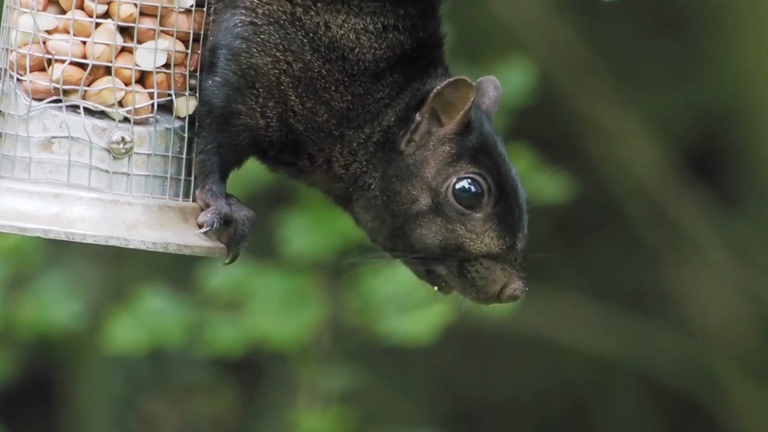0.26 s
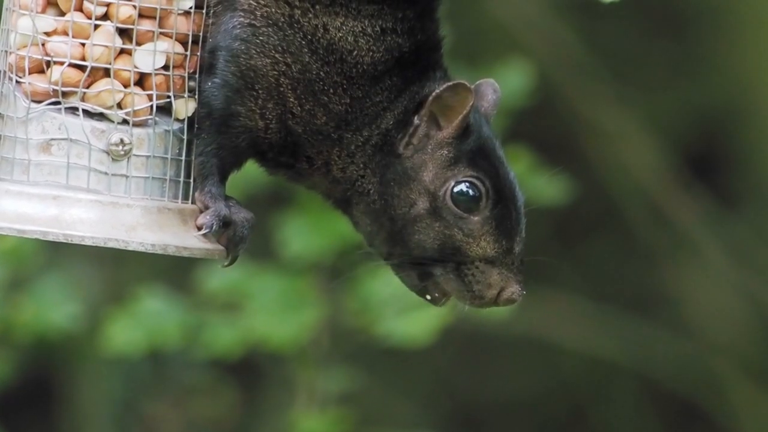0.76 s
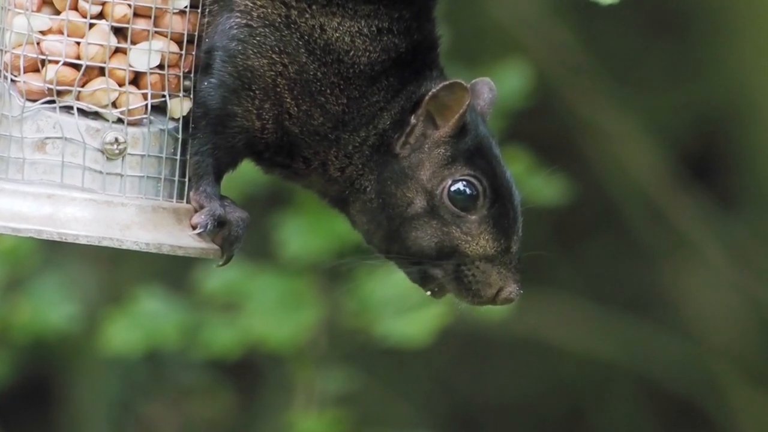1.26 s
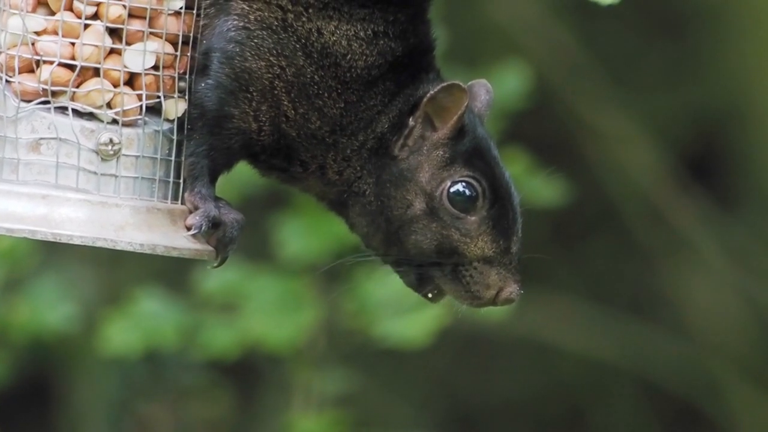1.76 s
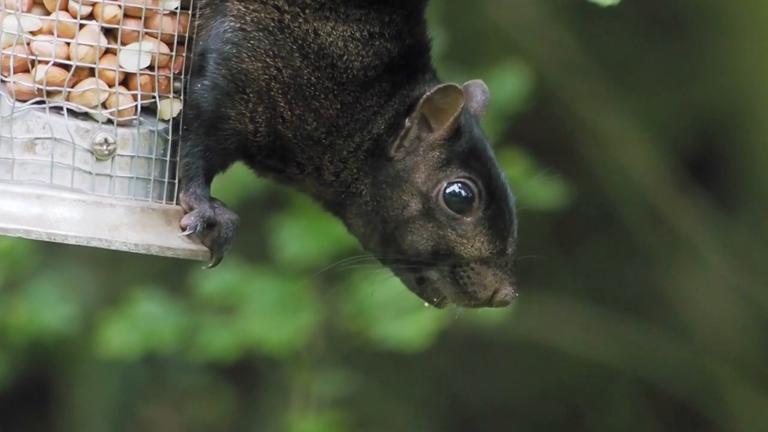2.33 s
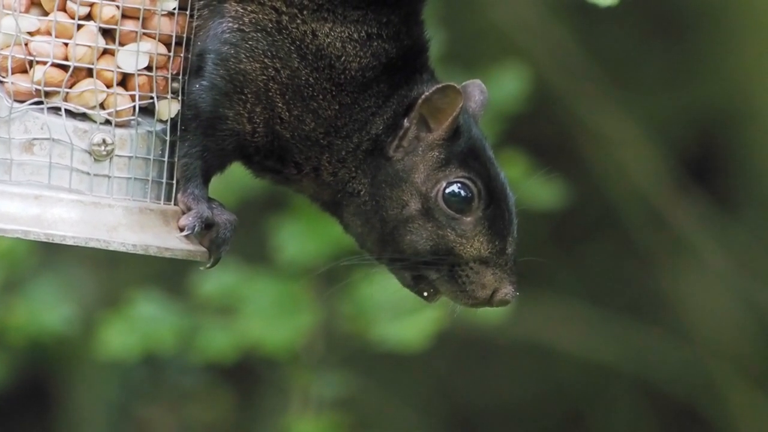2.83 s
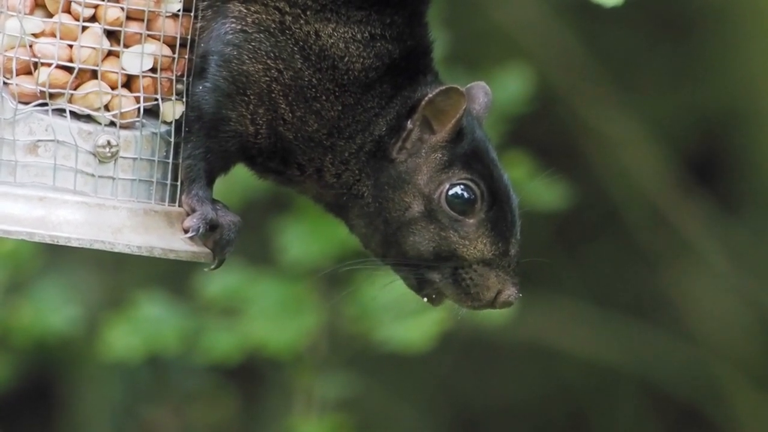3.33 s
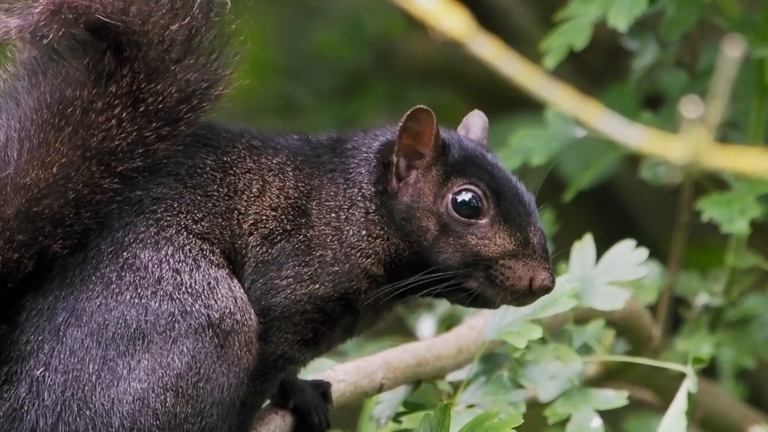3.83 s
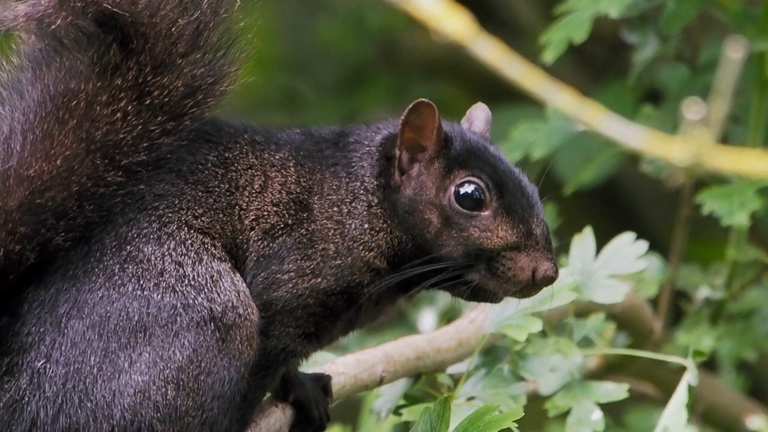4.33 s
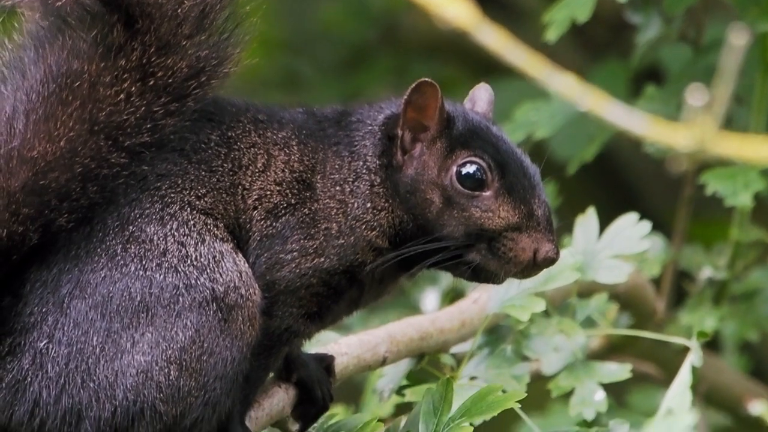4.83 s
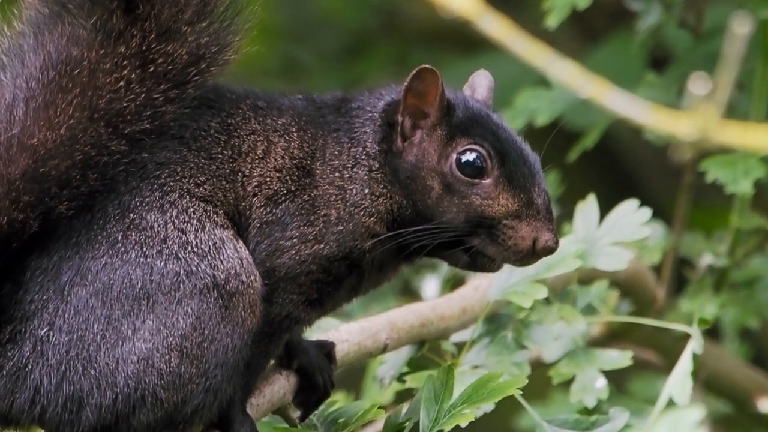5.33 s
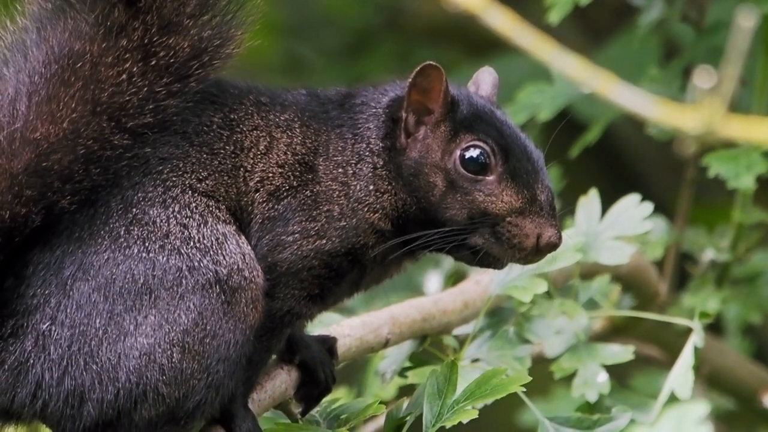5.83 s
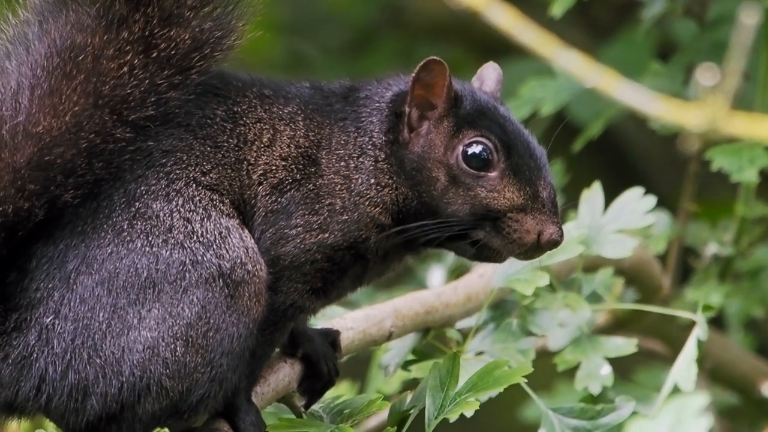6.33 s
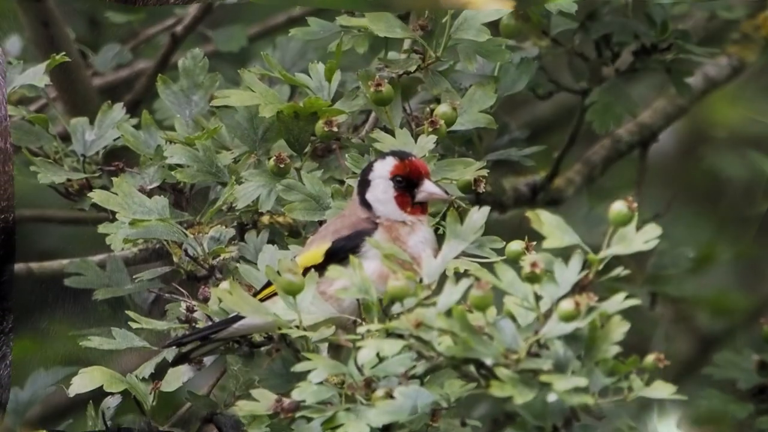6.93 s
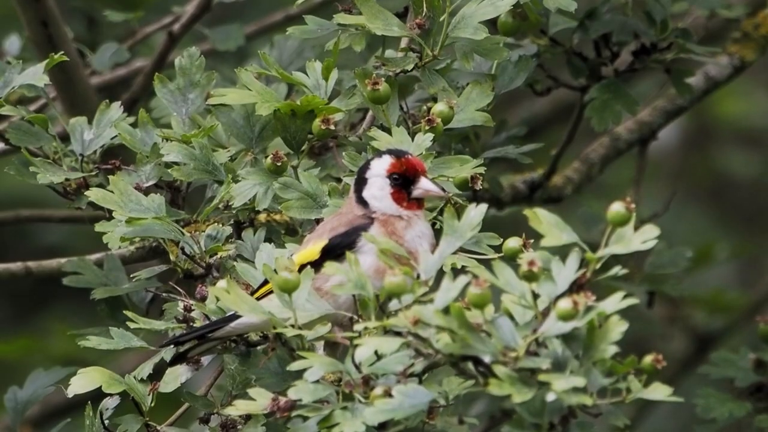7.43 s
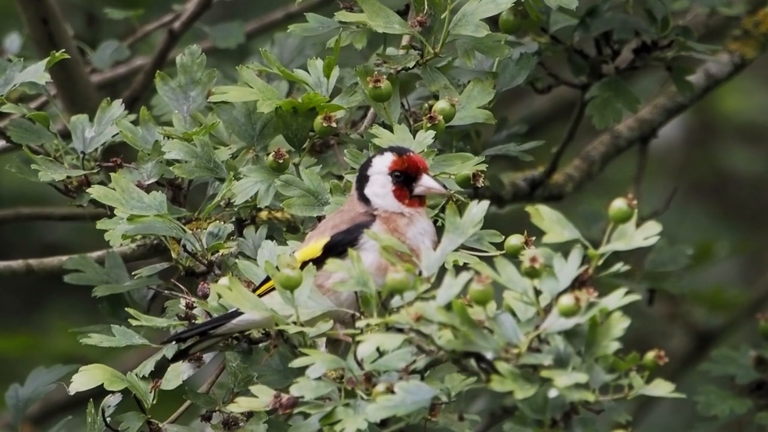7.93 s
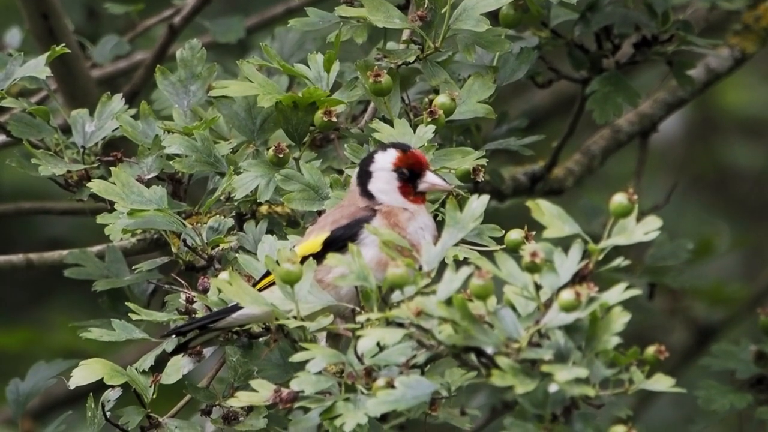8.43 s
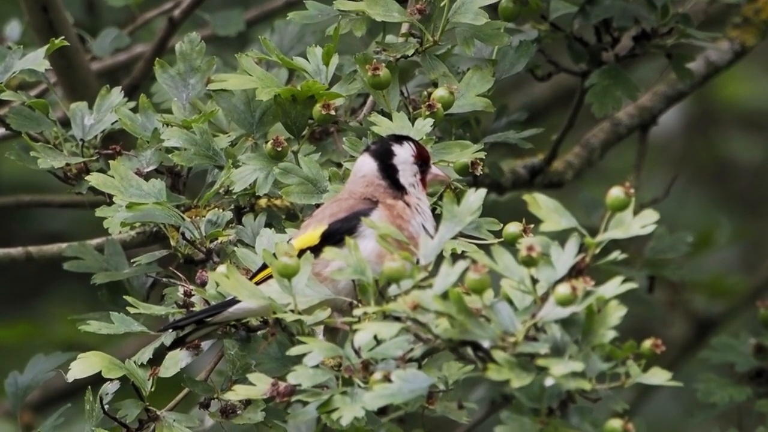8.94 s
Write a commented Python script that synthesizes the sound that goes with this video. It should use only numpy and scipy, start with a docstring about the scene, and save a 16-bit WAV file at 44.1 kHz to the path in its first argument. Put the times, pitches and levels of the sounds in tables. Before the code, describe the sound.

Harsh rasping screeches from a jay-like bird in echoing woodland, then thin mews and short barks, with bright falling songbird chirps.

```python
"""Low rumble, soft woodland wash and stereo microphone hiss last throughout, as filtered noise with a faint whine.
A jay-like bird screeches four long rasps, made of uneven pulses and breath shaped by throat resonances.
Quiet ticks of other birds, short wavering tones, are scattered from the first second to the end.
Then come thin whistled mews and a run of short barks, pulses again with one clear harmonic.
During the barks a songbird gives two bursts of high falling chirps, nearly pure tones; the wood echoes every bird."""
import sys
import numpy as np
from scipy import signal
from scipy.fft import rfft, irfft, next_fast_len
from scipy.io import wavfile
from scipy.ndimage import map_coordinates

SR = 44100
rng = np.random.default_rng(int(sys.argv[2]) if len(sys.argv) > 2 else 0)


def log_audio(samples):
    """Write samples as a 16-bit WAV file to the path given in sys.argv[1]."""
    # one column per channel
    frames = np.atleast_2d(samples).T
    # limit to full scale, then quantise
    limited = np.clip(frames, -1, 1)
    pcm = np.round(limited * 32767).astype(np.int16)
    wavfile.write(sys.argv[1], SR, pcm)


N = 404838
TIME = np.arange(N) / SR


def undb(db):
    """Turn decibels into a gain."""
    return 10 ** (np.asarray(db) / 20)


def unit(x):
    """Scale to an average strength (rms) of 1."""
    return x / np.sqrt(np.mean(x ** 2) + 1e-18)


def walk(rate, size):
    """Wander smoothly and at random with spread 1, about `rate` turns a second."""
    knots = rng.standard_normal(8192)
    return unit(map_coordinates(knots, [np.arange(size) * rate / SR], order=2, mode="wrap"))


def colour(x, shape, ratio=1):
    """Filter through (frequency, dB) points, their frequencies multiplied by ratio; the result has rms 1."""
    hz, db = np.transpose(shape)
    size = 2 * next_fast_len(len(x) // 2 + 2048)
    f = np.maximum(np.fft.rfftfreq(size, 1 / SR), 1)
    shape_db = np.interp(np.log(f), np.log(hz * ratio), db)
    cepstrum = irfft(np.log(undb(shape_db)))
    # keeping only the forward half lets each resonance ring after its pulse, never before
    response = np.exp(rfft(2 * cepstrum[:size // 2], size) - cepstrum[0])
    return unit(irfft(rfft(x, size) * response, size)[:len(x)])


def note_times(length):
    """Time in seconds of every sample in a note."""
    return np.arange(int(length * SR)) / SR


def fade(t, length, rise, fall):
    """Open and close a note smoothly; all times in seconds."""
    opening = np.clip(t / rise, 0, 1)
    closing = np.clip((length - t) / fall, 0, 1)
    return np.sin(np.pi / 2 * opening * closing) ** 2


def add(track, start, x):
    """Mix a sound into a track at a time in seconds."""
    i = int(start * SR)
    track[i:i + len(x)] += x[:N - i]


def whistle(hz, waver):
    """A single tone whose pitch trembles quickly by the share `waver`."""
    trembling_hz = hz * (1 + waver * walk(450, len(hz)))
    return unit(np.sin(2 * np.pi * np.cumsum(trembling_hz) / SR))


def air():
    """Rumble and woodland wash shared by both channels, hiss that differs between them, and an electronic whine."""
    # colour of the shared sound: (frequency [Hz], relative level [dB])
    shared_shape = [(12, -26.5), (20, -3), (44, -1), (66, -7), (80, -12.5), (144, -22.5), (362, -32),
                    (404, -30), (439, -32), (834, -32.5), (1010, -24), (1230, -24.5), (1820, -25.5),
                    (8170, -41.5), (15500, -39.5)]
    # colour of the difference between channels: (frequency [Hz], relative level [dB])
    difference_shape = [(12, -31), (20, -10), (80, 3), (133, -2.5), (166, -26), (191, 1), (252, -5),
                        (404, -4), (686, -8), (1010, -2.5), (1410, -2), (1540, -3.5), (4550, -6),
                        (8400, -14), (15500, -11.5)]
    shared_db, difference_db, whine_db = -52, -60.5, -82
    slow_drift = undb(0.19 * walk(3.535, N))
    mid = undb(shared_db) * colour(rng.standard_normal(N), shared_shape) * slow_drift
    side = undb(difference_db) * colour(rng.standard_normal(N), difference_shape)
    whine = undb(whine_db) * unit(np.sin(2 * np.pi * 14758 * TIME))
    return np.array([mid + side, mid - side]) + whine


def syrinx(hz, jitter, breath, rattle_db, rattle_hz):
    """Membranes slap shut at an uneven rate, air hisses through each opening, and a slower rattle shakes both."""
    size = len(hz)
    unsteady = 1 + jitter * walk(700, size) + 0.017 * walk(22, size)
    phase = np.cumsum(hz * np.clip(unsteady, 0.3, 2)) / SR
    cycle = phase.astype(int)
    # one click per cycle, each of its own random strength
    strength = undb(1.9 * rng.standard_normal(2048))
    slaps = np.diff(cycle, prepend=0) * strength[cycle]
    hiss = rng.standard_normal(size) * np.exp(-(phase % 1))  # fades within each cycle
    uneven_rattle_hz = rattle_hz * (1 + 0.143 * walk(58.8, size))
    rattle = np.sin(2 * np.pi * np.cumsum(uneven_rattle_hz) / SR)
    return (unit(slaps - slaps.mean()) + breath * unit(hiss)) * undb(rattle_db * rattle)


def rasps():
    """Long screeches: effort builds to a crest and eases; side resonances widen the band below and above the throat."""
    # long rasps: (start [s], length [s], time to full effort [s], level [dB], drop when slack [dB],
    #   pitch [Hz], pitch jitter [share], throat frequency [ratio], low resonance [dB], opening cough [dB],
    #   growl relative to low resonance [dB], high resonance [Hz], its level [dB],
    #   overtone [Hz], its level relative to high resonance [dB])
    rasp_calls = [(.076, 0.51, .44, -35, 2.5, 346.7, .15, 1.035, -11.5, -3, -8, 2820, -12.5, 5430, -11),
                  (1.549, 0.47, 0.3, -31.5, 8, 316.1, 0.056, 1.022, -15, -8, -15.5, 2890, -16.5, 5450, -14.5),
                  (2.395, 0.68, 0.22, -35.5, 3.5, 409.5, .13, 1.076, -18, -34, -22, 2593, -14.5, 5900, -17),
                  (3.459, 0.65, 0.51, -39, 5.5, 414.6, .075, 1.087, -23.5, -28, -21, 2290, -25, 4280, -5)]
    # main throat, low and growl resonances: (frequency [Hz], relative level [dB])
    throat_shape = [(600, -51.5), (950, -30.5), (1220, 1.5), (1550, 6), (1850, 1.5), (2100, 3),
                    (2300, -12.5), (2550, -50), (3200, -29.5), (4300, -32.5), (7000, -53.5)]
    low_shape = [(420, -52), (600, -37.5), (820, -17), (970, -3.5), (1130, 0), (1400, -48)]
    growl_shape = [(420, -51), (520, -28), (620, -14.5), (720, 2), (820, 6), (1000, -42)]
    # high resonance and its narrow overtone: (frequency [ratio to its own centre], relative level [dB])
    high_shape = [(.7, -37), (.88, 0.5), (1.0, -0.5), (1.08, -4.5), (1.19, -15.5), (1.5, -44)]
    overtone_shape = [(.75, -45), (.89, -16), (.95, -1), (1.04, 0), (1.1, -15), (1.3, -45)]
    end_effort = 0.38  # share of effort left at the end
    throat_rise, high_rise = 0.038, 0.1  # shares by which resonances climb with effort
    low_open_db, high_open_db = 7.5, 0.5  # how far the side resonances open
    cough_s, high_lag_s = 0.033, 0.089  # fading time of the cough, arrival time of the high resonance
    out = np.zeros(N)
    for (start, length, crest_s, db, swell_db, hz, jitter, ratio, low_db, cough_db,
         growl_db, high_hz, high_db, over_hz, over_db) in rasp_calls:
        t = note_times(length)
        progress = t / length
        effort = np.interp(t, [0, min(crest_s, length), length], [0, 1, end_effort])
        slack = 1 - effort
        source = syrinx(np.full(len(t), hz), jitter, breath=0.45, rattle_db=2.2, rattle_hz=56)

        def flutter():
            """Unsteady level of a side resonance."""
            return undb(1.66 * walk(23.7, len(t)))

        def strained(shape, top, rise):
            """Blend from a lower resonance when slack to a higher one at full effort."""
            relaxed = colour(source, shape, top * (1 - rise))
            return slack * relaxed + effort * colour(source, shape, top)

        throat = strained(throat_shape, ratio, throat_rise)
        # the low resonance sounds with the opening cough, then creeps in with a growl towards the end
        low_gain = undb(low_db - low_open_db * (1 - progress)) * flutter()
        cough_gain = undb(cough_db) * np.exp(-t / cough_s)
        low = (low_gain + cough_gain) * colour(source, low_shape)
        growl = low_gain * undb(growl_db) * (0.46 + progress) * colour(source, growl_shape)
        # the high resonance and its overtone come in late and follow the effort
        late = 1 - np.exp(-t / high_lag_s)
        high_gain = undb(high_db - high_open_db * slack) * late * flutter()
        overtone = undb(over_db) * colour(source, overtone_shape, over_hz)
        high = strained(high_shape, high_hz, high_rise) + overtone
        voice = throat + low + growl + high_gain * high
        loudness = undb(db - swell_db * slack) * fade(t, length, rise=0.042, fall=0.031)
        add(out, start, voice * loudness)
    return out


def ticks():
    """Brief notes of other small birds: a wavering tone whose pitch bows upward and may glide."""
    # ticks: (start [s], pitch [Hz], glide [share of pitch], level [dB])
    tick_notes = [(.81, 7500, 0.012, -61.5), (2.047, 7400, 0, -60), (2.049, 4280, 0.055, -44),
                  (2.197, 4080, -0.084, -50), (3.255, 4560, -0.02, -50), (3.742, 3050, .01, -52),
                  (3.957, 4500, 0, -56), (5.94, 7530, -0.063, -52.5), (7.747, 4620, -0.01, -53),
                  (8.467, 7500, -0.071, -57.5)]
    length = 0.029  # s
    pitch_bow, waver = 0.049, 0.02  # shares of the pitch
    out = np.zeros(N)
    t = note_times(length)
    bow = pitch_bow * (np.sin(np.pi * t / length) - 1)  # lowest at both ends
    for start, hz, glide, db in tick_notes:
        tone = whistle(hz * (1 + glide * t / length + bow), waver)
        add(out, start, undb(db) * tone * fade(t, length, length / 2, length / 2))
    return out


def mews():
    """Whistles slide up unsteadily and settle; the other side of the syrinx joins in hoarsely, higher up."""
    # thin mews: (start [s], length [s], settled pitch [Hz], level [dB], hoarseness [dB])
    mew_notes = [(4.116, 0.11, 2232, -43, -20), (4.228, 0.054, 2280, -50, -15),
                 (4.289, 0.32, 2291, -37.5, -10.5)]
    # colour of the hoarse noise: (frequency [Hz], relative level [dB])
    hoarse_shape = [(2200, -27), (2450, 4.5), (2750, 8.5), (2850, -12), (3050, -27), (3800, -6),
                    (4100, -29)]
    scoop, settle_s = 0.0798, 0.035  # starts this share flat; time scale of the slide
    waver, start_waver = 0.014, 0.031  # shares of the pitch: throughout, and extra until it settles
    crest, swell_db, sag_db = 0.26, 9, 8.5  # loudest at this share of the length; rise before, drop after
    out = np.zeros(N)
    for start, length, hz, db, hoarse_db in mew_notes:
        t = note_times(length)
        unsettled = np.exp(-t / settle_s)
        tone = whistle(hz * (1 - scoop * unsettled), waver + start_waver * unsettled)
        flicker = undb(2.2 * walk(89, len(t)))
        hoarse = colour(rng.standard_normal(len(t)), hoarse_shape) * (1 - unsettled)
        voice = tone * flicker + undb(hoarse_db) * hoarse
        loudness_db = db + np.interp(t / length, [0, crest, 1], [-swell_db, 0, -sag_db])
        add(out, start, voice * undb(loudness_db) * fade(t, length, rise=0.014, fall=0.014))
    return out


def barks():
    """Short squawks, mostly falling, from the same kind of voice; one harmonic stays clear above the rough pulses."""
    # short barks: (start [s], length [s], first pitch [Hz], last pitch [Hz], level [dB],
    #   throat frequency [ratio], clear harmonic relative to the rough voice [dB])
    bark_calls = [(4.34, 0.13, 433, 425, -39.5, 0.98, 0.5), (4.451, 0.091, 546, 414.4, -36.5, 1.1, -9.5),
                  (4.513, 0.078, 582, 471, -42, 0.82, -13), (4.61, 0.081, 574, 498, -42.5, 1, -12),
                  (4.647, .072, 533, 418.5, -44, 1.18, -5), (4.694, 0.0533, 537, 434, -44, 1.05, -13),
                  (4.927, 0.08, 504, 407.6, -33.5, .96, -12), (4.99, .07, 543, 414, -42.5, 0.83, -11),
                  (5.246, .085, 483, 477.4, -32, 1.03, -1), (5.28, 0.073, 534, 414.5, -33.5, 0.94, -11.5),
                  (5.347, 0.11, 516, 461, -49.5, 1.1, 2.5), (5.397, 0.077, 488, 475.6, -30.5, 1.044, -2.5),
                  (5.448, 0.073, 543, 447, -41, 0.82, -23), (5.798, .11, 521, 415, -32.5, 0.99, -24),
                  (5.862, 0.079, 625, 508, -39.5, .9, -4), (5.96, 0.094, 477, 443, -42.5, 0.92, -29),
                  (6.27, 0.13, 518, 403.5, -33.5, 0.9, -15), (6.347, 0.221, 426.4, 436.5, -37.5, .98, -2.5),
                  (6.97, 0.077, 381.5, 475, -45.5, .87, -8.5), (7.03, 0.099, 449, 468, -42.5, 0.85, -21),
                  (8.025, 0.32, 456.6, 538.6, -58.5, 0.69, -3), (8.301, 0.058, 612, 420, -52.5, 0.75, 6)]
    # throat resonances: (frequency [Hz], relative level [dB])
    throat_shape = [(500, -50.5), (740, -26), (900, -18.5), (1100, -3), (1300, 1), (1480, 1), (1750, 3.5),
                    (2050, -5), (2350, -22), (2700, -37), (3300, -35.5), (4100, -28.5), (5000, -44),
                    (7000, -57)]
    jitter, waver = 0.072, 0.016  # shares of the pitch: rough voice, clear harmonic
    held_glide = 0.07  # a bark gliding by less than this share counts as a held note
    sag_db_per_s = 22.5
    out = np.zeros(N)
    for start, length, first_hz, last_hz, db, ratio, clear_db in bark_calls:
        t = note_times(length)
        hz = np.linspace(first_hz, last_hz, len(t))
        source = syrinx(hz, jitter, breath=0.45, rattle_db=2.0, rattle_hz=110)
        # the third harmonic is clear on a held pitch, the second on a glide
        held = abs(last_hz / first_hz - 1) < held_glide
        harmonic = 3 if held else 2
        clear = undb(clear_db) * whistle(harmonic * hz, waver)
        voice = colour(source, throat_shape, ratio) + clear
        loudness = undb(db - sag_db_per_s * t) * fade(t, length, rise=0.038, fall=0.03)
        add(out, start, voice * loudness)
    return out


def chirps():
    """Nearly pure tones flick up to a top pitch and slide down, swelling to a peak before a softer tail."""
    # songbird chirps: (start [s], length [s], top pitch [Hz], last pitch [Hz], level [dB],
    #   time of the loudest moment after the start [s])
    chirp_notes = [(4.65, 0.044, 6940, 5930, -39, 0.022), (4.745, 0.049, 7400, 5600, -38.5, 0.028),
                   (4.844, 0.068, 7170, 5400, -37.5, 0.036), (7.216, 0.045, 7640, 6230, -23, 0.023),
                   (7.291, .053, 7600, 6020, -24.5, 0.022), (7.38, 0.062, 7320, 5520, -25.5, 0.015),
                   (7.483, 0.068, 7220, 5510, -31, 0.018)]
    flick, top_s = 0.21, 0.00995  # starts this share flat; time to reach the top pitch
    tremble, octave_db = 0.0095, -32  # share of the pitch; level of the tone an octave up
    swell_db, tail_db, drop_s = 25, -5, 0.0031  # rise to the peak, level after it, time to drop there
    out = np.zeros(N)
    for start, length, top_hz, last_hz, db, crest_s in chirp_notes:
        t = note_times(length)
        hz = np.interp(t, [0, top_s, length], [top_hz * (1 - flick), top_hz, last_hz])
        trembling_hz = hz * (1 + tremble * walk(589, len(t)))
        phase = 2 * np.pi * np.cumsum(trembling_hz) / SR
        tone = unit(np.sin(phase) + undb(octave_db) * np.sin(2 * phase))
        loudness_db = db + np.interp(t, [0, crest_s, crest_s + drop_s], [-swell_db, 0, tail_db])
        add(out, start, tone * undb(loudness_db) * fade(t, length, rise=0.0015, fall=0.008))
    return out


def wood(x, lag_ms, pan_db, near_db, near_t60, far_db, far_t60):
    """Nearby trunks echo from the bird's side, far ones from all round; each t60 is the seconds to fade by 60 dB."""
    t = TIME[:SR]
    # sparse random echoes, none in the first 2 ms
    trunks = rng.standard_normal(SR) * (rng.random(SR) < 0.03) * (t > 0.002)
    near = trunks * undb(-60 * t / near_t60)
    near *= undb(near_db) / np.linalg.norm(near)
    near[0] = 1  # the direct sound
    # dense far echoes, partly alike in the two channels
    far = rng.standard_normal((3, SR)) * undb(-60 * t / far_t60) * np.clip(t / 0.0097, 0, 1)
    far = far[:2] + 0.74 * far[2]
    far *= undb(far_db) / np.linalg.norm(far[0])
    pair = np.array([signal.fftconvolve(x, near + side)[:N] for side in far])
    # the sound reaches the left microphone late
    size = next_fast_len(N)
    khz = np.fft.rfftfreq(size, 1000 / SR)
    delay = np.exp(-2j * np.pi * khz * lag_ms)
    pair[0] = irfft(rfft(pair[0], size) * delay, size)[:N]
    # a negative pan makes the right channel louder
    balance = undb(np.array([[pan_db], [-pan_db]]) / 2)
    return pair * balance / np.sqrt(1 + undb(near_db) ** 2)


def scene():
    """The screecher sits deep in the echoes; the small birds have less echo and sound more to the right."""
    screecher = wood(rasps() + mews() + barks(), lag_ms=0.04, pan_db=-0.5,
                     near_db=-3.5, near_t60=0.26, far_db=-8.0, far_t60=0.52)
    small_birds = wood(ticks() + chirps(), lag_ms=0.096, pan_db=-1.2,
                       near_db=-8, near_t60=0.08, far_db=-8, far_t60=0.28)
    return air() + screecher + small_birds


def record(dry):
    """The recorder steeply cuts everything above 15.8 kHz."""
    low_pass = signal.ellip(10, 0.1, 70, 15800, fs=SR, output="sos")
    return signal.sosfilt(low_pass, dry)


dry = scene()
out = record(dry)
log_audio(out)
```